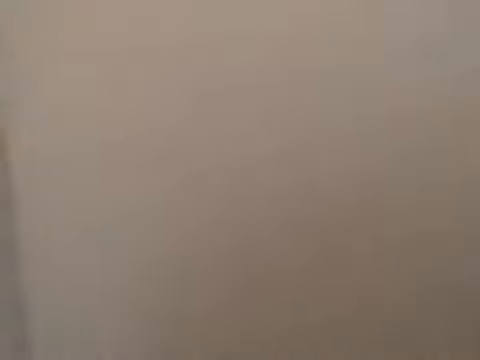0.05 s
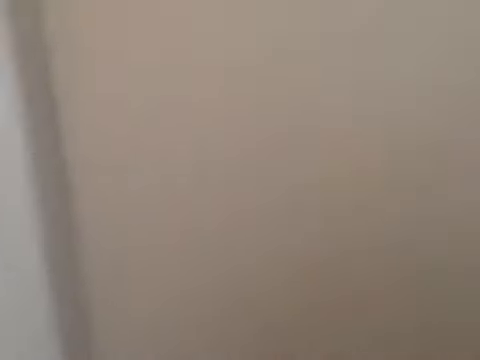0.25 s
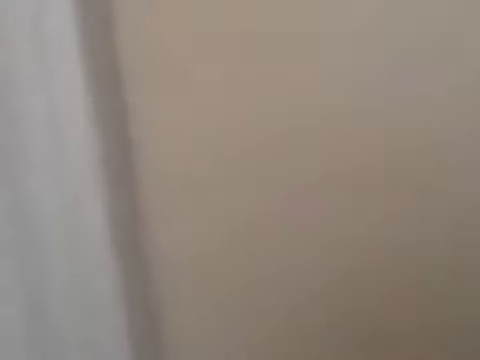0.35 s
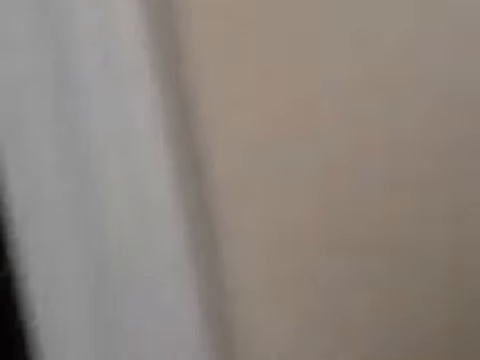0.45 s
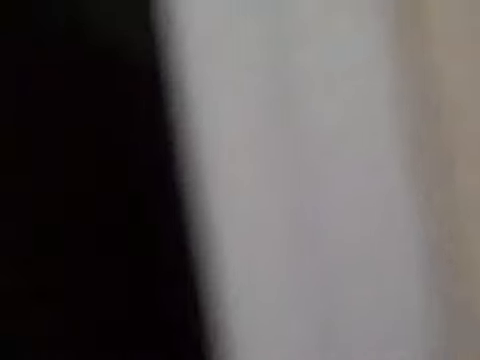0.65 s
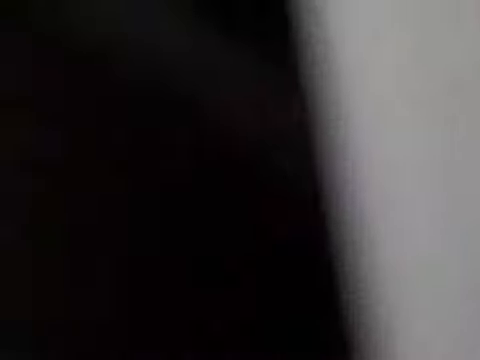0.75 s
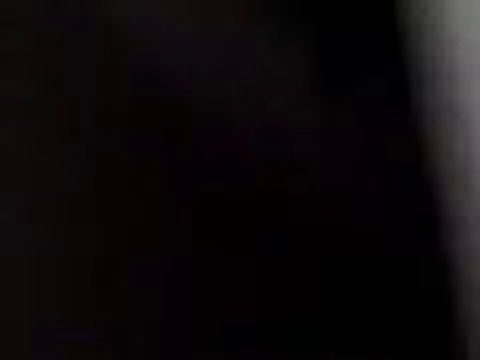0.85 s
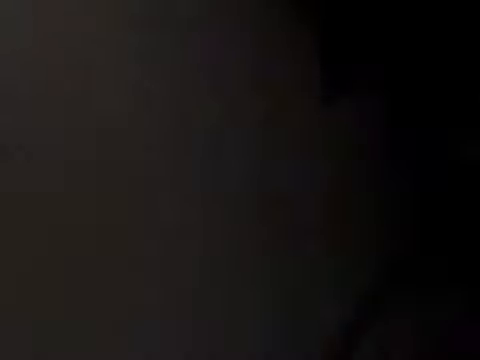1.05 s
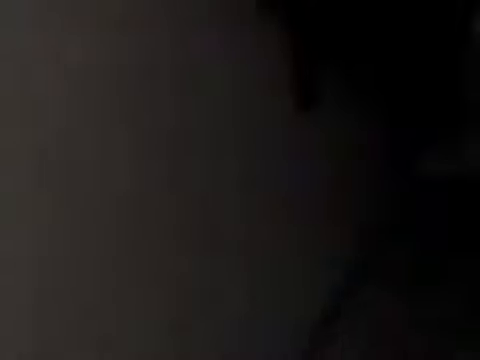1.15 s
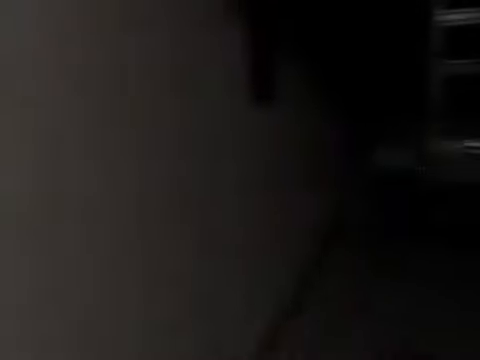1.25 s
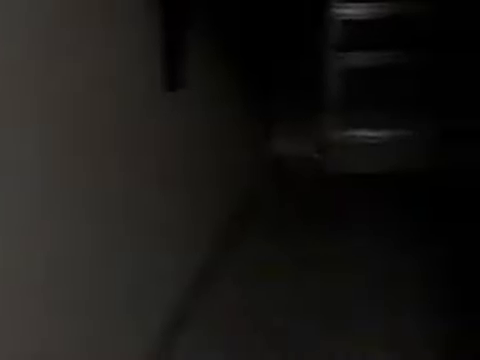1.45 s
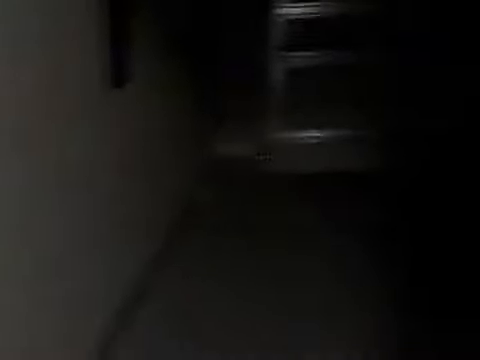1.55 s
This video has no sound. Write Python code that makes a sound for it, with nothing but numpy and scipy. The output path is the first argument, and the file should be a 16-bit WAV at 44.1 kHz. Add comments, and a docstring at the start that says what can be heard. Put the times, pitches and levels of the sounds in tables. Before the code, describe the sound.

A door opens close by in a bare, echoing room. The handle clicks lightly, then at about 0.3 seconds the panel pops free with a sharp knock and a short scrape. It brushes over the floor from 0.5 seconds, with a click, then a clack of loose hardware at 0.8. Two small ticks and soft thuds come between 1 and 1.3 seconds as the brushing and low rumble fade.

```python
"""A door opens into a bare, echoing room

The handle clicks, the bolt slides, the panel jumps out of its frame with a knock and the seal
scrapes free. The door brushes on through its swing and its loose hardware clacks. Small ticks
and soft thuds follow, while the hollow panel rumbles and moving air buffets the microphone."""
import sys
import numpy as np
from scipy import signal
from scipy.fft import rfft, irfft, next_fast_len
from scipy.io import wavfile

SR = 44100
rng = np.random.default_rng(int(sys.argv[2]) if len(sys.argv) > 2 else 0)


def to_wav(s):
    """Save 16-bit WAV."""
    ch = np.atleast_2d(s).T  # columns
    pcm = np.round(np.clip(ch, -1, 1) * 32767)  # PCM
    wavfile.write(sys.argv[1], SR, pcm.astype(np.int16))


N = 70560


def amp(db):
    """Turn decibels into a gain."""
    return 10 ** (np.asarray(db) / 20)


def unit(x):
    """Scale x to an average (rms) level of 1."""
    return x / np.sqrt(np.mean(x ** 2) + 1e-20)


def along(points, hz):
    """Read between (Hz, value) points, spacing the octaves evenly."""
    freqs, values = np.transpose(points)
    return np.interp(np.log(hz + 1), np.log(freqs + 1), values)


def since(start):
    """Seconds since the start, zero before it."""
    return np.maximum(np.arange(N) / SR - start, 0)


def level(rows):
    """A gain for every sample, drawn through (seconds, dB) rows."""
    return amp(np.interp(since(0), *np.transpose(rows)))


def fade(start, t60, attack_s=0.00045):
    """A quick rise, then a fall of 60 dB in t60 seconds: the fade time."""
    t = since(start)
    return (1 - np.exp(-t / attack_s)) * amp(-60 * t / t60)


def filtered(x, response):
    """Scale each frequency in x by response(hz)."""
    size = next_fast_len(N + SR // 2)
    hz = np.fft.rfftfreq(size, 1 / SR)
    return irfft(rfft(x, size) * response(hz), size)[:N]


def coloured(x, spectrum):
    """Shape the tone of x with (Hz, dB) rows, at an average level of 1."""
    return unit(filtered(x, lambda hz: amp(along(spectrum, hz))))


def noise(spectrum):
    """Fresh noise of the given tone colour."""
    return coloured(rng.standard_normal(N), spectrum)


def friction(spectrum, slips_per_s, slip_share):
    """Rubbing: tiny random slips over a smooth hiss."""
    slips = unit((rng.random(N) < slips_per_s / SR) * rng.standard_normal(N))
    hiss = rng.standard_normal(N)
    return coloured(np.sqrt(slip_share) * slips + np.sqrt(1 - slip_share) * hiss, spectrum)


def rattle(hz, sharpness, broad_db=-60):
    """Noise ringing around one pitch, with some broad noise beside it."""
    ring = lambda f: 1 / (1 + 1j * sharpness * (f / hz - hz / (f + 1))) + amp(broad_db)
    return unit(filtered(rng.standard_normal(N), ring))


def in_room(x, echo_db, build_s=0.0042):
    """Add the echo of bare walls, each frequency dying at its own speed."""
    # The room's echo. Each row: frequency in Hz, fade time in seconds.
    fade_times = [(100, 0.62), (500, 1.33), (2000, 1.73), (5000, 1.95), (10000, 0.85)]
    hz, t, spectra = signal.stft(rng.standard_normal(N), SR, nperseg=256)
    decay = amp(-60 * t / along(fade_times, hz)[:, None])
    tail = signal.istft(spectra * decay, SR, nperseg=256)[1][:N]
    tail *= 1 - np.exp(-since(0) / build_s)
    return x + amp(echo_db) * signal.fftconvolve(x, tail / np.linalg.norm(tail))[:N]


def room_noise():
    """The room's quiet, steady, low hush."""
    # Tone of the hush. Each row: frequency in Hz, level in dB.
    tone = [(30, 7), (80, -1), (200, 5), (550, -1), (900, -11), (1800, -15), (2600, -18), (5000, -22),
            (10400, -22), (13000, -58.5)]
    return amp(-58.5) * noise(tone)


def draught():
    """The door pushes air at the microphone, making a very deep flutter."""
    # Push of the air. Each row: time in seconds, level in dB.
    push = [(0, -51), (.12, -61), (.27, -37.5), (.48, -32), (.61, -37), (.73, -34.5), (.93, -41),
            (1.12, -42), (1.27, -37), (1.42, -42.5), (1.6, -38.5)]
    # Its tone. Each row: frequency in Hz, level in dB.
    tone = [(6, -1.5), (18, 5.5), (36, 1.5), (55, -20.5), (80, -36), (300, -79)]
    return level(push) * noise(tone)


def thuds(width_s=0.011):
    """Soft, low bumps, like footfalls on a hard floor."""
    # The bumps. Each row: time of the peak in seconds, level in dB, pitch in Hz.
    bumps = [(1.046, -35, 135), (1.315, -28.5, 68)]
    out = np.zeros(N)
    for peak_s, db, hz in bumps:
        t = since(0) - peak_s
        out += amp(db) * np.exp(-.5 * (t / width_s) ** 2) * np.cos(2 * np.pi * hz * t)
    return out


def rumble():
    """The hollow panel drones and booms as it moves."""
    # Loudness of the drone and the deeper boom. Each row: time in seconds, level in dB.
    drone_levels = [(.10, -80), (.17, -39.5), (.23, -39), (.33, -34.5), (.44, -36.5), (.53, -73),
                    (.65, -50), (.85, -43.5), (1.09, -40.5), (1.2, -49.5), (1.42, -53.5), (1.6, -61)]
    boom_levels = [(.10, -59), (.18, -42), (.32, -39.5), (.46, -34), (.55, -38.5), (.61, -74), (.78, -61),
                   (.85, -40), (1.08, -40.5), (1.18, -50.5), (1.6, -53)]
    # Their tones. Each row: frequency in Hz, level in dB.
    drone_tone = [(70, -15), (115, -1), (150, 2.5), (180, -2), (203, 6.5), (240, -2), (320, -2.5),
                  (380, -6), (500, -33.5)]
    boom_tone = [(35, -20), (58, -4), (72, 0), (97, 0), (120, -11), (180, -35), (400, -70)]
    return level(drone_levels) * noise(drone_tone) + level(boom_levels) * noise(boom_tone)


def ticks():
    """Small metal parts touch: a bright tick, a weaker body under it and a hissing echo."""
    # The touches. Each row: start in seconds, level in dB, pitch in Hz, body's relative level in dB.
    touches = [(1.1426, -31.5, 6300, -26), (1.2158, -24, 8400, -6)]
    # Tones of the metal and the body. Each row: frequency in Hz, level in dB.
    metal_tone = [(2500, -25), (5000, -13), (6500, -11), (8800, -5.5), (10400, -13.5), (13000, -39)]
    body_tone = [(500, -41), (1400, 1), (2800, -5.5), (4700, -9), (7000, -8.5)]
    out = np.zeros(N)
    for start, db, hz, body_db in touches:
        metal = rattle(hz, sharpness=4.1) + amp(-7.5) * noise(metal_tone)
        body = amp(body_db) * fade(start, t60=0.073) * noise(body_tone)
        echo = amp(-24.5) * fade(start, t60=1) * noise(metal_tone)
        out += amp(db) * (fade(start, t60=0.022) * metal + body + echo)
    return in_room(out, echo_db=-6)


def floor_strip(dulls_from_s=0.34, dulls_db_per_s=20, split_hz=2530):
    """The bottom strip brushes the floor, its treble fading as the swing goes on."""
    # Loudness of the brushing. Each row: time in seconds, level in dB.
    loudness = [(.25, -58), (.44, -37.5), (.52, -37.5), (.55, -34), (.65, -32.5), (.74, -30), (.88, -31.5),
                (1.0, -37), (1.2, -42), (1.4, -48), (1.6, -56.5)]
    # Its tone. Each row: frequency in Hz, level in dB.
    tone = [(90, -32), (130, -7), (165, -9.5), (205, -1.5), (380, -2.5), (470, 2), (600, 0), (920, -6.5),
            (1400, -3.5), (2500, -9), (3600, -10), (4500, -10.5), (8600, -13), (10400, -22.5), (13000, -65)]
    rub = friction(tone, slips_per_s=2500, slip_share=0.34)
    low = filtered(rub, lambda hz: 1 / (1 + (hz / split_hz) ** 4))
    treble = amp(-dulls_db_per_s * since(dulls_from_s)) * (rub - low)
    return in_room(level(loudness) * (low + treble), echo_db=-8)


def clacks():
    """Loose hardware chatters in a quick cluster of hits."""
    # The hits. Each row: start in seconds, level in dB, fade time in seconds, pitch in Hz.
    hits = [(0.7805, -20, 0.053, 2740), (.788, -24.5, 0.058, 3540), (.794, -22.5, 0.077, 1550),
            (0.807, -29.5, 0.34, 1860)]
    # Tone of the hardware. Each row: frequency in Hz, level in dB.
    tone = [(240, -32), (450, -2), (700, -14), (1150, 1), (1600, -1.5), (2400, 0.5), (3200, -6.5),
            (4400, -11.5), (6000, -15.5), (7700, -8), (10400, -14), (13000, -41)]
    out = np.zeros(N)
    for start, db, t60, hz in hits:
        chatter = noise(tone) + amp(-4.5) * rattle(hz, sharpness=3.8)
        out += amp(db) * fade(start, t60) * chatter
    return in_room(out, echo_db=-14.5)


def latch():
    """Each click of the handle and bolt rattles around one pitch."""
    # The clicks. Each row: start in seconds, level in dB, pitch in Hz, fade time in seconds,
    # broad noise's relative level in dB.
    clicks = [(0.036, -50, 1400, 0.098, -31), (0.039, -45.5, 3540, 0.019, -33),
              (0.044, -43, 530, 0.05, -44), (0.122, -35.5, 504, 0.12, -47), (0.156, -40, 4100, 0.05, -23),
              (.164, -34.5, 1525, 0.098, -41), (0.1654, -39, 6500, 0.016, -17),
              (0.187, -34.5, 6750, 0.024, -12), (0.195, -43, 8450, 0.027, -21),
              (.214, -37, 7100, 0.015, -26), (0.255, -27.5, 6450, 0.097, 1), (.297, -26, 4900, 0.02, -14),
              (0.537, -25.5, 4500, 0.063, 3)]
    out = np.zeros(N)
    for start, db, hz, t60, broad_db in clicks:
        out += amp(db) * fade(start, t60) * rattle(hz, sharpness=5.8, broad_db=broad_db)
    return in_room(out, echo_db=-5)


def bolt():
    """The bolt slides over the plate in the frame with a gritty hiss."""
    # Loudness of the slide. Each row: time in seconds, level in dB.
    loudness = [(.13, -93), (.195, -42), (.245, -42.5), (.265, -40), (.30, -26), (.33, -33), (.40, -37),
                (.47, -45), (.6, -100)]
    # Tone of the plate. Each row: frequency in Hz, level in dB.
    tone = [(400, -14.5), (1500, -1), (3000, -3.5), (5200, -5.5), (7300, -5), (8500, -15), (10400, -26.5),
            (13000, -49)]
    grit = friction(tone, slips_per_s=900, slip_share=0.52)
    return in_room(level(loudness) * grit, echo_db=-29)


def seal():
    """The seal drags out of the frame in many small slips."""
    # Loudness of the scrape. Each row: time in seconds, level in dB.
    loudness = [(.12, -100), (.19, -47), (.25, -52.5), (.275, -36), (.31, -31.5), (.332, -24), (.385, -23),
                (.44, -29.5), (.49, -59), (.7, -100)]
    # Its tone. Each row: frequency in Hz, level in dB.
    tone = [(150, -39), (290, -2), (350, -6), (520, -5), (680, -12), (820, -1.5), (1300, 0.5), (2100, 3.5),
            (2550, -0.5), (2900, 1.5), (3600, -12), (6400, -15), (10400, -21.5), (13000, -67)]
    scrape = friction(tone, slips_per_s=3900, slip_share=0.48)
    return in_room(level(loudness) * scrape, echo_db=-9.5)


def knocks():
    """Every blow rings the door panel's own notes under a short, sharp crack."""
    # The blows. Each row: start in seconds, ring level in dB, crack level in dB.
    blows = [(.120, -36, -64), (.157, -37, -49), (.186, -35.5, -49), (0.262, -31, -15), (0.2675, -18, -19),
             (0.272, -10, -5.5), (0.276, -30, -17.5)]
    # The panel's notes. Each row: pitch in Hz, relative level in dB, fade time in seconds.
    notes = [(72.4, -17, 0.87), (145.2, -15, 0.3), (160.8, -19.5, 0.6), (159, -4, 0.07),
             (203.4, -17.5, 0.77), (237, -3, 0.027), (249, -19.5, 0.29), (285, -17.5, 0.4),
             (557, -7, 0.061), (773, -9.5, 0.062)]
    # Tone of the crack. Each row: frequency in Hz, level in dB.
    crack_tone = [(150, -18.5), (300, 5), (800, -4.5), (1050, -2.5), (1600, 2.5), (2200, -10.5),
                  (3500, -0.5), (5000, 0.5), (6200, -2), (6800, -22), (7600, -4), (8300, -22), (9600, -5),
                  (10400, -29.5), (13000, -40)]
    panel, crack = np.zeros(N), np.zeros(N)
    for start, db, crack_db in blows:
        for hz, note_db, t60 in notes:
            gain = amp(db + note_db + rng.normal(0, 1))
            wave = np.cos(2 * np.pi * hz * since(start))
            panel += gain * fade(start, t60, attack_s=0.00079) * wave
        crack += amp(crack_db) * fade(start, t60=0.012) * noise(crack_tone)
    return in_room(panel, echo_db=-9) + in_room(crack, echo_db=-6)


def scene():
    """The door and its hardware over quiet room noise."""
    door = latch() + bolt() + knocks() + seal() + floor_strip() + clacks() + ticks() + rumble()
    return (door + draught() + thuds() + room_noise())[None]


def record(dry):
    """Round off the loudest peaks and cut away the highest treble."""
    ceiling, top_hz = 0.62, 10400
    rounded = dry[0] / (1 + np.abs(dry[0] / ceiling) ** 6) ** (1 / 6)
    return filtered(rounded, lambda hz: 1 / np.sqrt(1 + (hz / top_hz) ** 200))[None]


dry = scene()
out = record(dry)
to_wav(out)
```